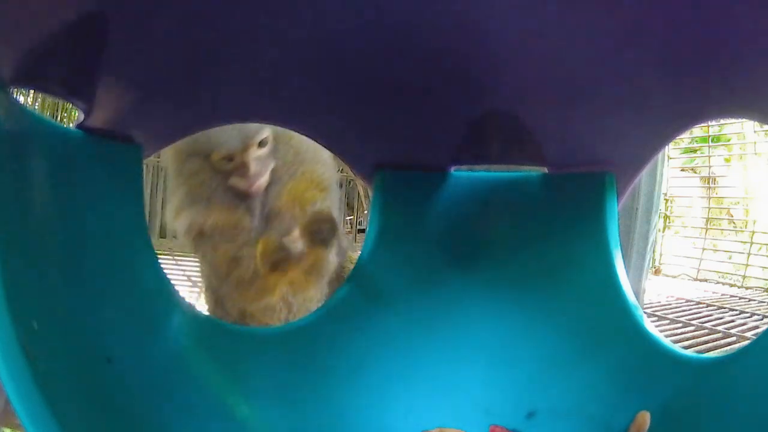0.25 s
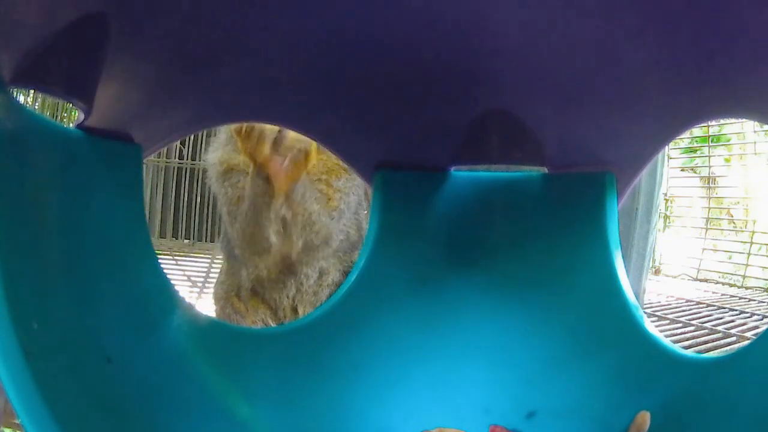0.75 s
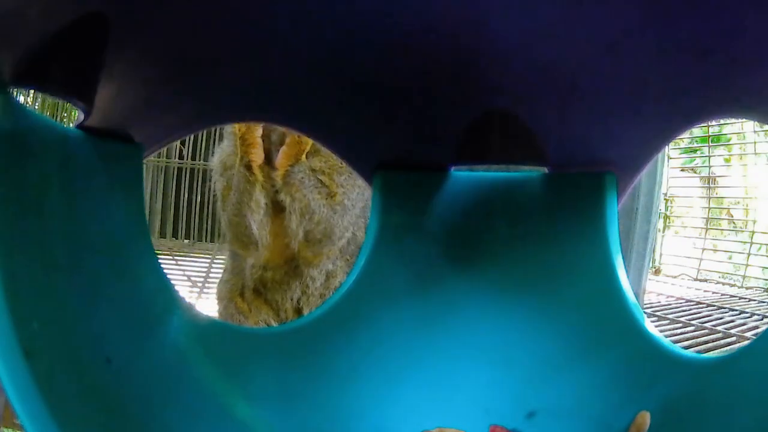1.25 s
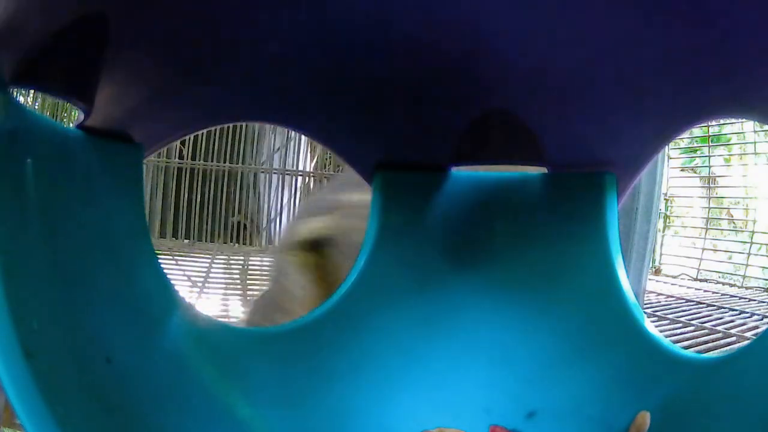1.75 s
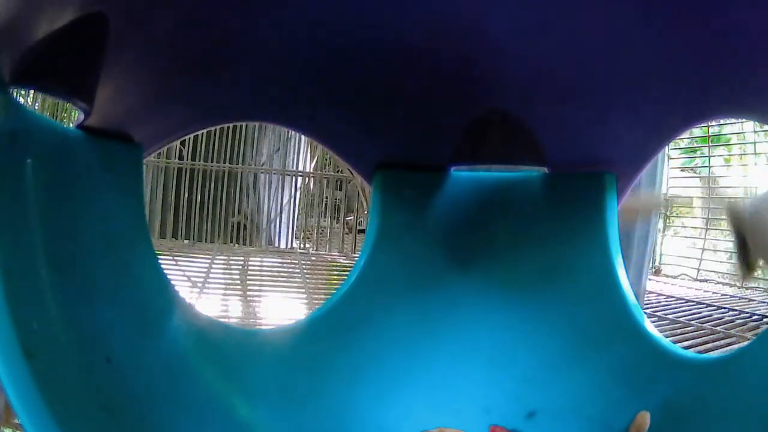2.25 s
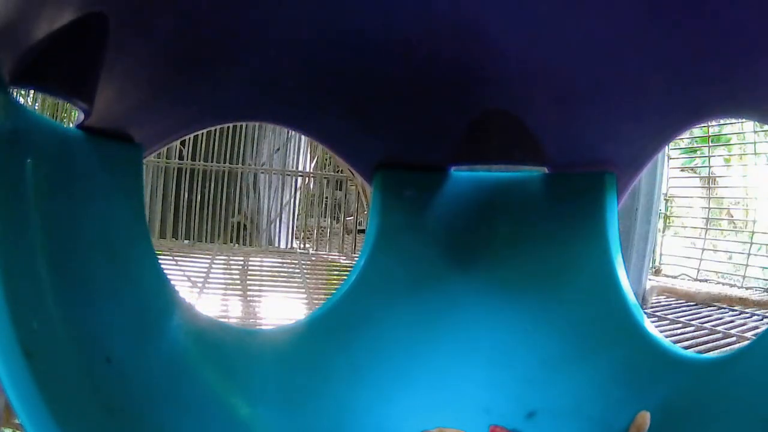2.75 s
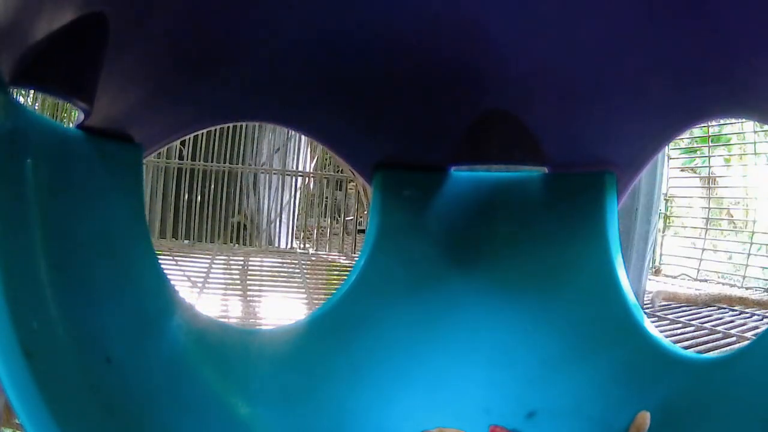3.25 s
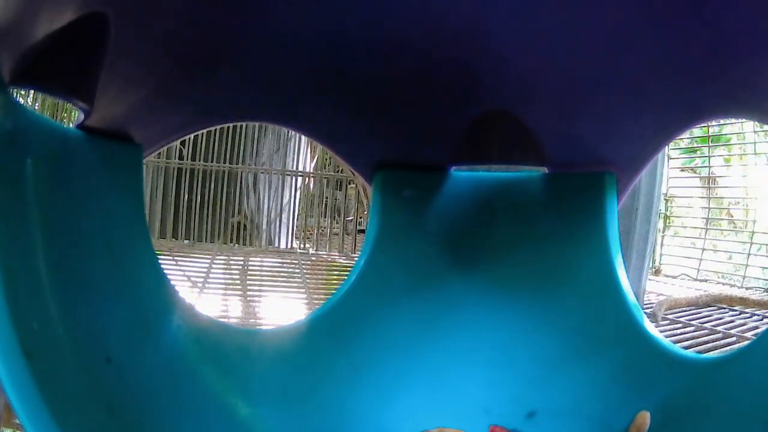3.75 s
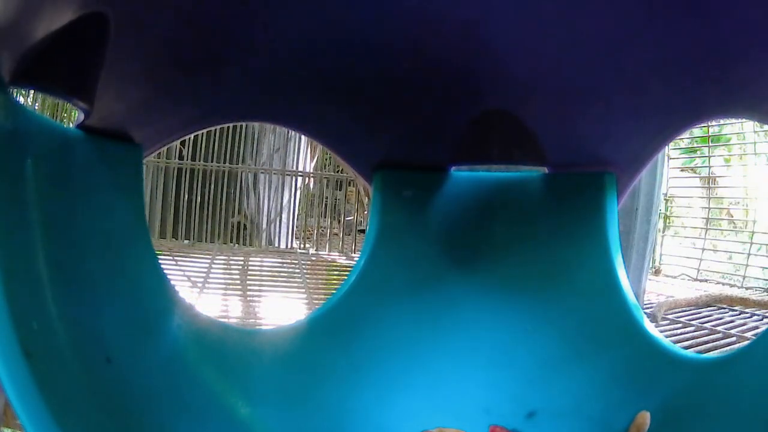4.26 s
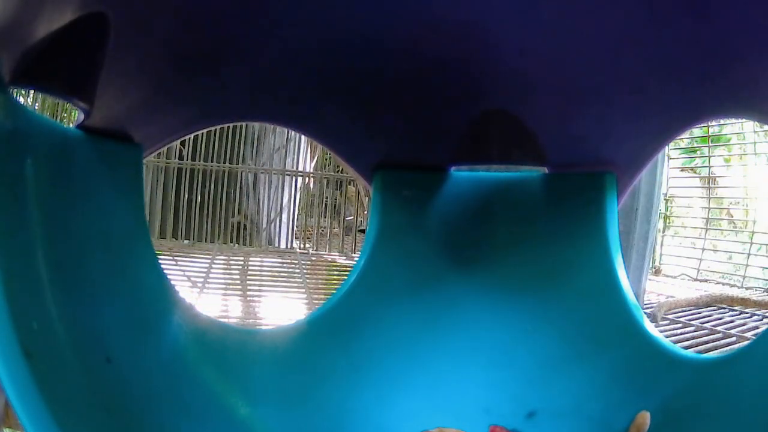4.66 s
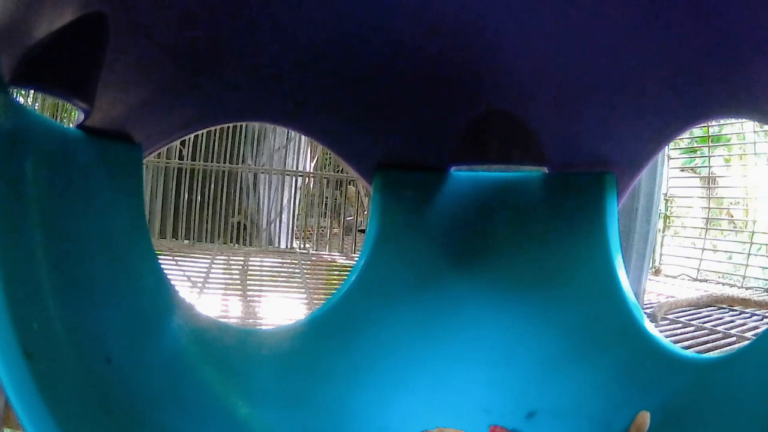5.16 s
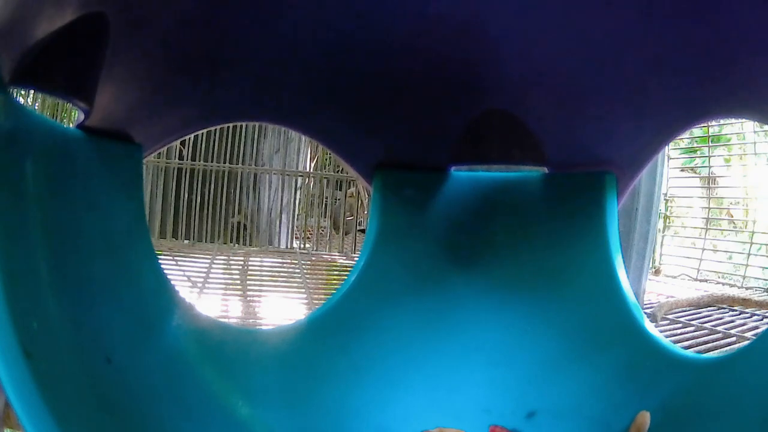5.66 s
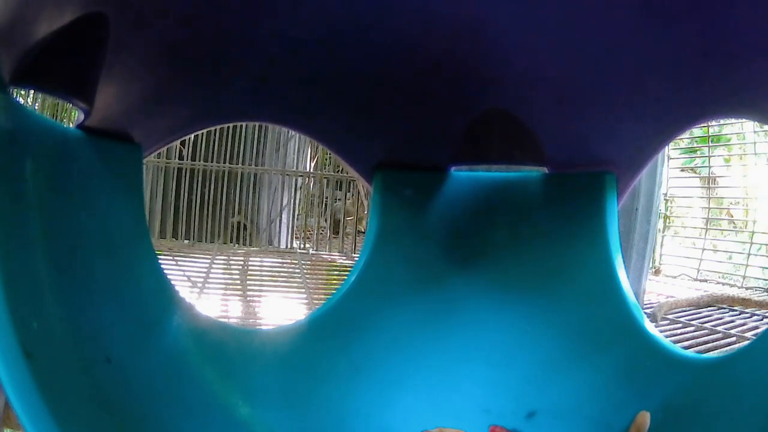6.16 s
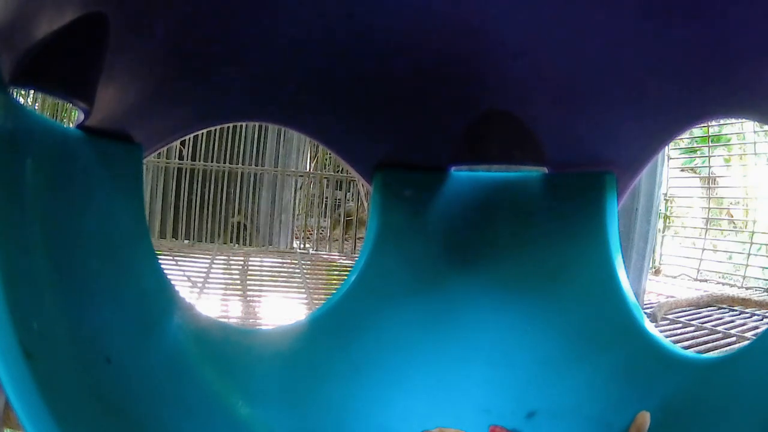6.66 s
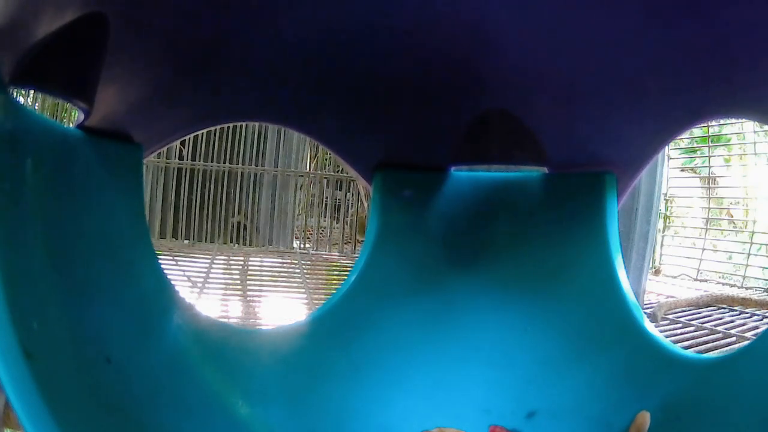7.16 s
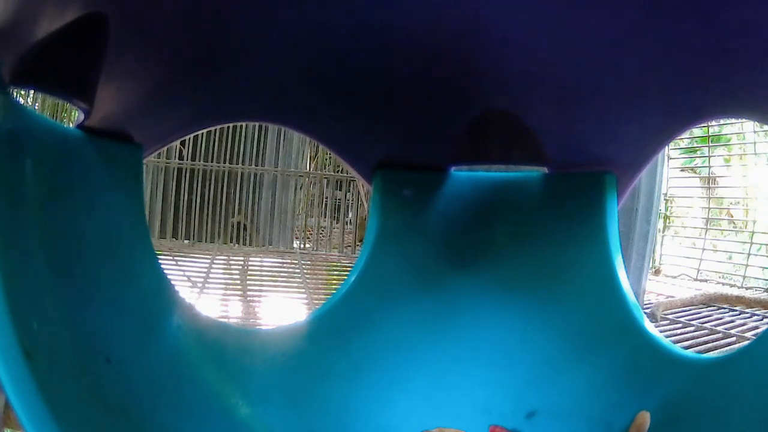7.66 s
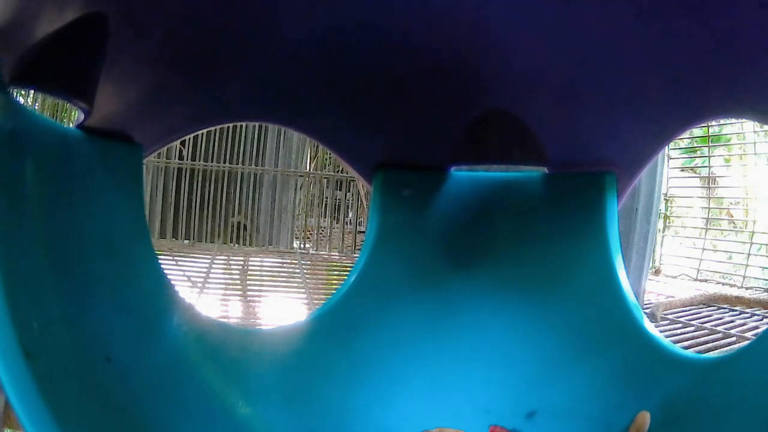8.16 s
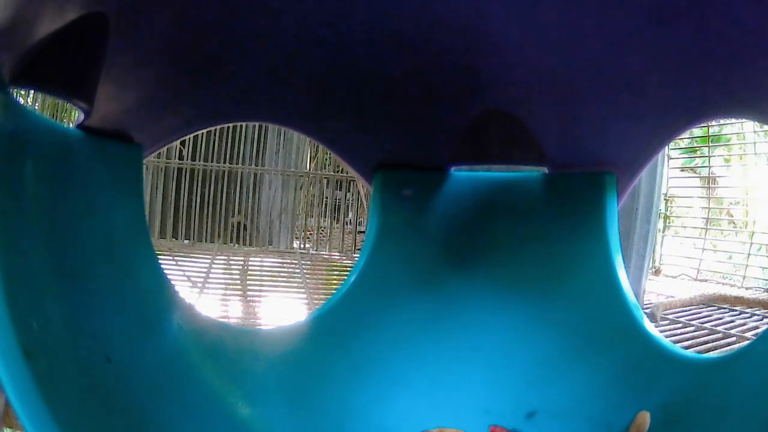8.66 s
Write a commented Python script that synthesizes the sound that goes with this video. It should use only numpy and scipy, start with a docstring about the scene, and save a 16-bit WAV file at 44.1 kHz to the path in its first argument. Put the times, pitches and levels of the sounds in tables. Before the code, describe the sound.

Tiny monkeys give short, very high chirps at irregular intervals over a faint outdoor rush, while one briefly scampers across a hollow plastic shelter.

```python
"""Tiny monkeys chirp around a hollow plastic shelter in an outdoor cage: short whistles that sweep
upward and echo in the shell. One scampers over the shelter, knocking its modes. Behind them lie
a steady low rush, far insects, faint bright ticks and a thin whine that fades; a fainter one enters late.
A small camera in the shelter samples slowly and unevenly, which adds a rasp and gives each whistle
a mirror image above 8 kHz."""
import sys
import numpy as np
from scipy import signal
from scipy.fft import rfft, irfft
from scipy.io import wavfile
from scipy.ndimage import map_coordinates

SR = 44100
rng = np.random.default_rng(int(sys.argv[2]) if len(sys.argv) > 2 else 0)


def generate_wav(sig):
    """Save sig (samples, or channels by samples) to the path in sys.argv[1] as 16-bit PCM at SR."""
    pcm = np.round(np.clip(np.atleast_2d(sig).T, -1, 1) * 32767).astype(np.int16)
    wavfile.write(sys.argv[1], SR, pcm)


N = 392490
TIME = np.arange(N) / SR
FREQS = np.maximum(np.fft.rfftfreq(N, 1 / SR), 1)
SAMPLING_HZ = 16000  # the camera's slow clock


def from_db(db):
    """Decibels to gain."""
    return 10 ** (np.asarray(db) / 20)


def unit_rms(x):
    """Scale to unit power."""
    return x / np.sqrt(np.mean(x ** 2) + 1e-20)


def noise(gain):
    """Noise whose density per root Hz is the given gain at each frequency."""
    return irfft(rfft(rng.standard_normal(N)) * gain, N) * np.sqrt(SR / 2)


def drift(rate_hz):
    """A smooth random modulator of unit power."""
    return unit_rms(noise(1 / (1 + (FREQS / rate_hz) ** 2)))


def bell(hz, width):
    """A bell curve over frequency, of height 1."""
    return np.exp(-2 * ((FREQS - hz) / width) ** 2)


def resonate(x, hz, width):
    """A two-pole resonance with unit gain at its peak."""
    radius = np.exp(-np.pi * width / SR)
    feedforward = np.array([1, 0, -1]) * (1 - radius ** 2) / 2
    feedback = [1, -2 * radius * np.cos(2 * np.pi * hz / SR), radius ** 2]
    return signal.lfilter(feedforward, feedback, x + 1e-18)


def reverb(x, t60, build_s):
    """Dense reflections that build up and die away; the tail has unit energy."""
    t = TIME[:SR]
    tail = rng.standard_normal(SR) * from_db(-60 * t / t60) * np.clip(t / build_s, 0, 1) ** 2
    return signal.fftconvolve(x, tail / np.linalg.norm(tail))[:N]


# Base spectrum of the ambience bed: f/Hz, density/dB
RUSH_SPECTRUM = [(25, -109), (90, -110), (135, -103), (155, -92), (175, -93.5), (215, -80.5), (300, -79.5),
                 (500, -83), (700, -81.5), (870, -81.5), (1050, -93.5), (1500, -96.5), (2800, -100.3),
                 (4500, -103.1), (6500, -100.5), (8000, -91.5)]
# Peaks and dips that colour it: f/Hz, width/Hz, gain/dB
RUSH_COLOUR = [(2107, 220, 6), (2440, 420, -2.5), (3120, 220, 4), (3520, 250, -3), (4020, 180, 2.5),
               (5080, 220, 2), (5500, 730, -2), (5700, 160, 0.5), (6060, 250, -1)]


def rush(waver_db=0.3):
    """The surroundings: a smooth noise bed, strongest below 1 kHz, with hollow peaks above."""
    hz, db = np.transpose(RUSH_SPECTRUM)
    base_db = np.interp(np.log(FREQS), np.log(hz), db)
    colour_db = sum(lift * bell(centre, width) for centre, width, lift in RUSH_COLOUR)
    bed = noise(from_db(base_db + colour_db) * (FREQS < SAMPLING_HZ / 2))
    return bed * from_db(waver_db * drift(4.8))


# Fader curve of the insect chorus: t/s, relative level/dB
INSECT_FADER = [(0.0, -68.5), (2.52, -72), (2.99, -68), (4.26, -71), (4.51, -70), (5.46, -69.5),
                (6.03, -65), (8.8, -68)]
# Bands it sings in: f/Hz, width/Hz, relative level/dB
INSECT_BANDS = [(6980, 120, -2), (7454, 300, 4), (7700, 300, -34)]


def insects(trim_db=5.5, flicker_db=0.5):
    """A far chorus blurs into narrow bands of hiss."""
    spectrum = sum(from_db(db) * bell(hz, width) for hz, width, db in INSECT_BANDS)
    chorus = unit_rms(noise(spectrum))
    fader_db = np.interp(TIME, *np.transpose(INSECT_FADER))
    return chorus * from_db(trim_db + fader_db + flicker_db * drift(6.4))


def wavering_tones(partials, wander_hz, waver_db):
    """A cluster of thin sines, each wavering on its own in pitch and level."""
    out = np.zeros(N)
    for hz, db in partials:
        phase = 2 * np.pi * np.cumsum(hz + wander_hz * drift(26.7)) / SR
        out += np.sqrt(2) * from_db(db + waver_db * drift(1.6)) * np.sin(phase)
    return out


# Partials of the opening whine: f/Hz, relative level/dB
EARLY_PARTIALS = [(3910, -76), (4016, -78), (4172, -76), (4434, -79), (4708, -76), (5060, -74), (5476, -79),
                  (5818, -70), (5920, -70), (6003, -72), (6104, -77), (6260, -77), (6370, -74), (6520, -73),
                  (6782, -73), (6928, -73)]


def early_whine(trim_db=3, hold_s=1.44, fade_db_per_s=8, lead_hz=4958, lead_db=-67.5):
    """A thin whine with a little hiss holds, then fades; its strongest tone swells once."""
    swell_db = 4 * np.exp(-((TIME - 1.5) / 0.13) ** 2)
    lead = from_db(swell_db) * wavering_tones([(lead_hz, lead_db)], wander_hz=6.8, waver_db=0.7)
    hiss = from_db(-65.5) * unit_rms(noise(bell(hz=6000, width=2800)))
    cluster = wavering_tones(EARLY_PARTIALS, wander_hz=5, waver_db=3)
    fader_db = trim_db - fade_db_per_s * np.maximum(TIME - hold_s, 0)
    return from_db(fader_db) * (cluster + lead + hiss)


# Partials of the closing whine: f/Hz, relative level/dB
LATE_PARTIALS = [(3985, -84), (4096, -86), (4840, -83), (4958, -86), (5125, -85), (5865, -86), (5975, -80)]


def late_whine(trim_db=6, full_at_s=7.3, rise_db_per_s=41):
    """A much fainter whine fades in near the end and stays."""
    fader_db = trim_db - rise_db_per_s * np.maximum(full_at_s - TIME, 0)
    return from_db(fader_db) * wavering_tones(LATE_PARTIALS, wander_hz=9.9, waver_db=1.5)


# Faint, short, bright ticks: t/s, peak level/dB, f/Hz
FAINT_TICKS = [(3.16, -49, 4700), (4.334, -48, 3100), (8.349, -49, 5110)]


def ticks(decay_s=0.0068, width_hz=900):
    """Each tick is a fast-decaying noise burst through one bright resonance."""
    out = np.zeros(N)
    age = TIME[:SR // 10]
    for onset, db, hz in FAINT_TICKS:
        burst = rng.standard_normal(len(age)) * np.exp(-age / decay_s)
        tick = resonate(burst, hz, width_hz)
        start = int(onset * SR)
        out[start:start + len(age)] += from_db(db) * tick / np.abs(tick).max()
    return out


def pressure(onset, length, attack_s=0.0013):
    """Envelope of one contact: it sets in at once and eases off."""
    age = np.maximum(TIME - onset, 0)
    return np.minimum(age / attack_s, 1) * np.exp(-(age / length) ** 2 / 2)


# Body and tail brushing the plastic: t/s, length/s, relative level/dB
FUR_BRUSHES = [(.005, 0.044, -48.5), (1.86, 0.032, -51), (1.928, 0.037, -47), (2.153, 0.2, -49.5),
               (2.572, 0.16, -52), (4.858, 0.029, -53.5)]
# Footfalls on the shelter: t/s, relative level/dB, claw brightness/dB
FOOTFALLS = [(1.741, -38.5, -20), (1.887, -39.5, -13), (1.914, -41, -4), (1.997, -39.5, 3),
             (2.035, -37.5, -5), (2.084, -45.5, 4.5), (2.613, -50, -6), (2.657, -47, -5)]
# Resonances of the plastic shell: f/Hz, width/Hz, gain/dB
SHELL_MODES = [(207, 57, -3), (406, 110, -4.5), (649, 85, 1), (727, 38, 4.5), (870, 62, 4.5),
               (1220, 950, -15), (1585, 190, -8.5), (1927, 93, -3.5), (3060, 120, -11.5),
               (4700, 1500, -19.5)]


def scamper(grains_per_s=1500, scuff_s=0.024, pad_hz=900, thump_db=-1, bright_above_hz=1100):
    """Padded feet thump the shell's low modes; tiny claw and fur contacts reach the upper ones too."""
    fur = sum(from_db(db) * pressure(onset, length) for onset, length, db in FUR_BRUSHES)
    fur *= from_db(1.5 * drift(rate_hz=25))  # fur catches and slips unevenly
    low_drive, high_drive = fur, fur * from_db(4.5)  # and sounds bright
    impacts = np.zeros(N)
    for onset, level_db, claw_db in FOOTFALLS:
        push = from_db(level_db) * pressure(onset, scuff_s)
        low_drive += push
        high_drive += push * from_db(claw_db)
        impacts[int(onset * SR)] = from_db(level_db + thump_db)
    grains = rng.standard_normal(N) * (rng.random(N) < grains_per_s / SR)
    grains /= np.std(sum(from_db(db) * resonate(grains, hz, width) for hz, width, db in SHELL_MODES))
    thumps = signal.sosfilt(signal.butter(3, pad_hz, fs=SR, output="sos"), impacts)
    shell = np.zeros(N)
    for k, (hz, width, db) in enumerate(SHELL_MODES):
        scuff = grains * (high_drive if hz > bright_above_hz else low_drive)
        knock = thumps * SR / (2 * np.pi * width)  # offsets the weaker kick of a narrow resonator
        shell += (-1) ** k * from_db(db) * resonate(scuff + knock, hz, width)
    low_cut = signal.butter(4, 150, "high", fs=SR, output="sos")  # the small shell radiates no bass
    return signal.sosfilt(low_cut, shell)


def whistle(age, length, top_hz, glide_s, swell_db, start_hz=5455, attack_s=0.0015, release_s=0.0038):
    """Pitch and loudness rise together and level off; the call ends abruptly."""
    age = np.maximum(age, 0)
    rise = np.tanh(age / glide_s)
    rise_integral = glide_s * np.log(np.cosh(age / glide_s))
    phase = 2 * np.pi * (start_hz * age + (top_hz - start_hz) * rise_integral)
    tone = np.sin(phase) + from_db(-28) * np.sin(2 * phase)
    gate = np.clip(age / attack_s, 0, 1) * np.clip((length - age) / release_s, 0, 1)
    return gate * from_db(swell_db * (rise - 1)) * tone


# Early reflections off the nearest walls: delay/s, gain against the direct sound
WALL_ECHOES = [(.0034, 0.38), (.0057, 0.6), (.011, 0.29)]
# Monkey calls: t/s, length/s, top f/Hz, glide/s, level/dB, swell over the glide/dB
MONKEY_CALLS = [(0.561, 0.031, 7170, 0.0073, -27, -1), (2.019, 0.0293, 7127, .014, -24, 14),
                (2.757, 0.0355, 7113, .012, -24, 18), (2.865, 0.025, 8060, .016, -32, 10.5),
                (4.463, 0.033, 7727, .012, -29, 6), (6.005, 0.0368, 6973, .009, -25, 16),
                (6.775, 0.028, 7154, 0.0097, -27.5, 13.5), (8.891, 0.028, 7090, 0.0084, -23, 2)]


def monkey_chirps(rough_db=3, rough_hz=230, near_db=-21, send_db_per_db=0.39):
    """Slightly rough whistles beat against their wall echoes. Returns the calls and a reverb send."""
    calls, send = np.zeros((2, N + SR))
    age = TIME[:SR // 10]
    roughness = from_db(rough_db * drift(rough_hz))
    paths = [(0, 1), *WALL_ECHOES]
    for k, (onset, length, top_hz, glide_s, level_db, swell_db) in enumerate(MONKEY_CALLS):
        call = sum(gain * whistle(age - lag, length, top_hz, glide_s, swell_db) for lag, gain in paths)
        call *= roughness[k * len(age):(k + 1) * len(age)]
        call *= from_db(level_db) / np.sqrt(np.sum(call ** 2) / (length * SR))
        span = slice(int(onset * SR), int(onset * SR) + len(age))
        calls[span] += call
        # Fainter calls come from farther off, so they are wetter.
        send[span] += call * from_db(send_db_per_db * (near_db - level_db))
    return calls[:N], send[:N]


def scene(shell_db=-12.5, cage_db=-28.5):
    """The calls ring briefly in the shell and faintly in the cage, over movement and ambience."""
    calls, send = monkey_chirps()
    shell = from_db(shell_db) * reverb(send, t60=0.11, build_s=0.012)
    cage = from_db(cage_db) * reverb(send, t60=0.55, build_s=0.074)
    movement = scamper()
    ambience = ticks() + rush() + insects() + early_whine() + late_whine()
    return (calls + shell + cage + movement + ambience)[None]


def record(dry, asymmetry=0.27, jitter_samples=0.18, dull_hz=11300, cutoff_hz=12400):
    """The camera's lo-fi colour: a lopsided input, slow uneven sampling and a dulled top end."""
    bent = dry[0] + asymmetry * dry[0] ** 2  # puts a soft thump under loud calls
    instants = np.arange(0, N, SR / SAMPLING_HZ)
    jitter = jitter_samples * rng.standard_normal(len(instants))  # adds the rasp
    samples = map_coordinates(bent, [instants + jitter], order=3, mode="nearest")
    mirrored = np.interp(np.arange(N), instants, samples)  # straight joins leave a mirror image
    dulled = signal.sosfilt(signal.butter(6, dull_hz, fs=SR, output="sos"), mirrored)
    fade_out = np.minimum((TIME[-1] - TIME) / 0.002, 1)
    high_cut = signal.ellip(10, 0.2, 70, cutoff_hz, fs=SR, output="sos")
    return signal.sosfilt(high_cut, dulled * fade_out)[None]


dry = scene()
out = record(dry)
generate_wav(out)
```